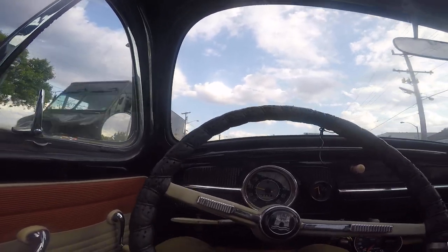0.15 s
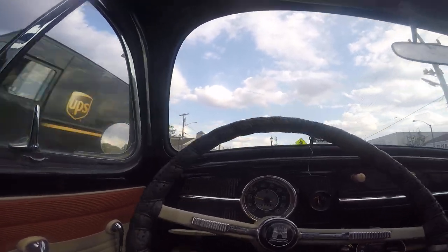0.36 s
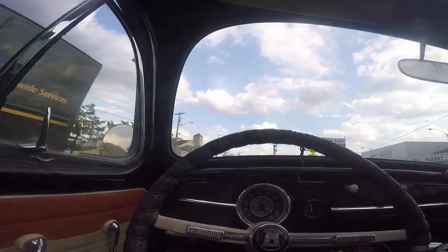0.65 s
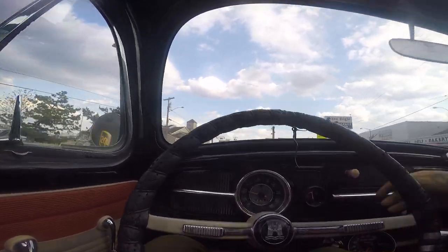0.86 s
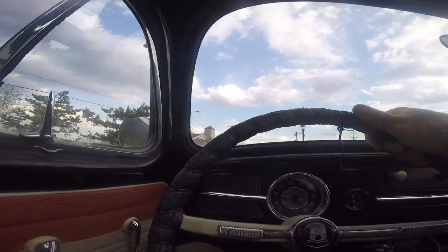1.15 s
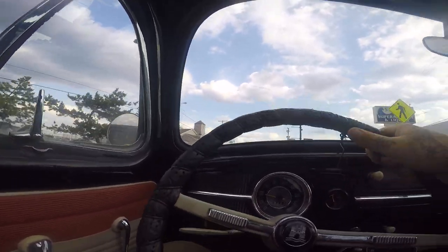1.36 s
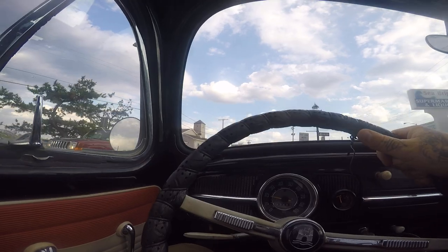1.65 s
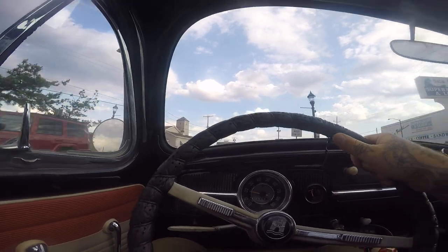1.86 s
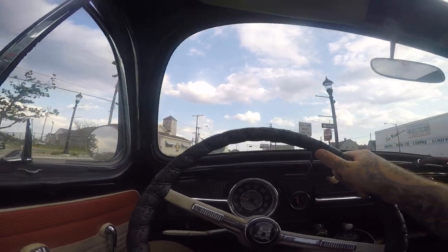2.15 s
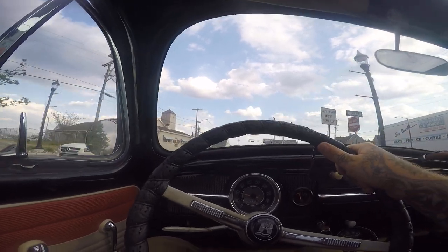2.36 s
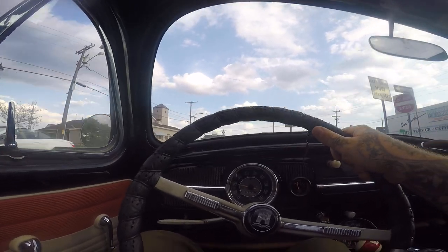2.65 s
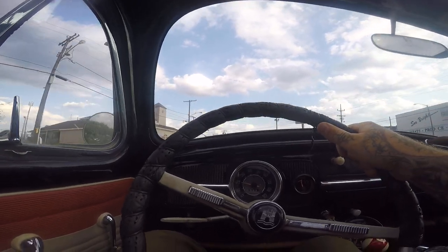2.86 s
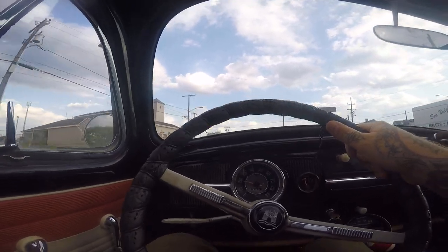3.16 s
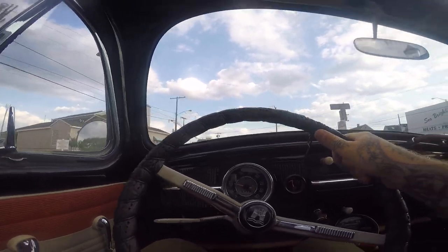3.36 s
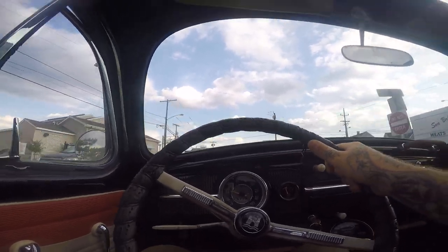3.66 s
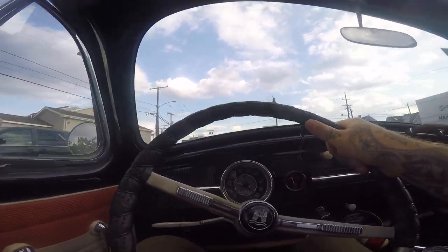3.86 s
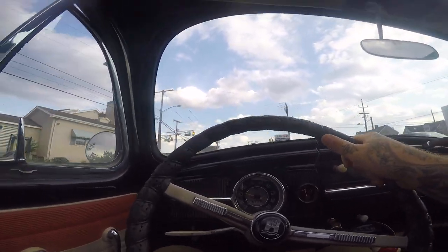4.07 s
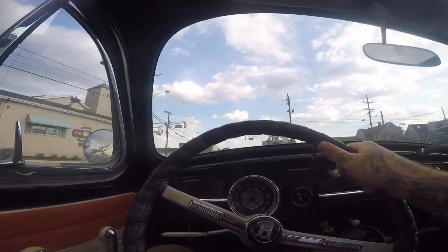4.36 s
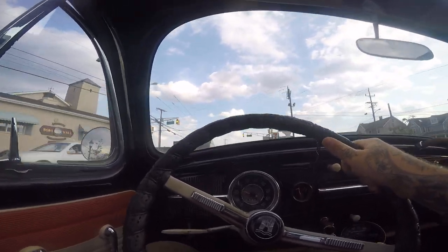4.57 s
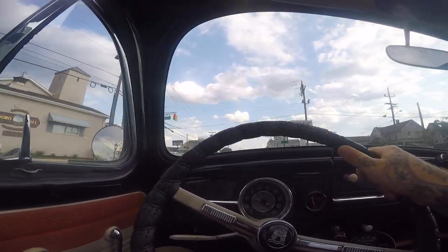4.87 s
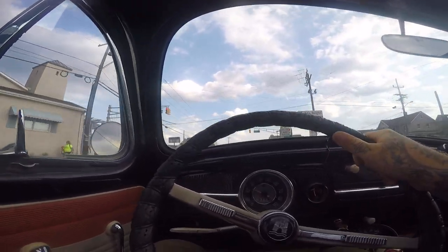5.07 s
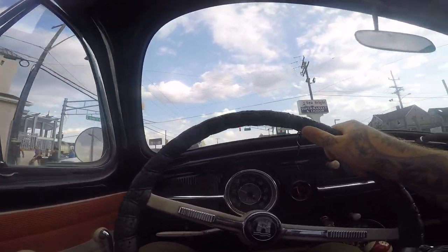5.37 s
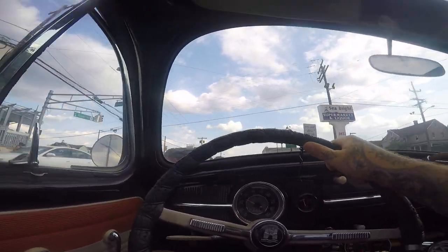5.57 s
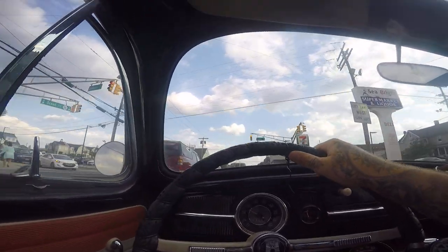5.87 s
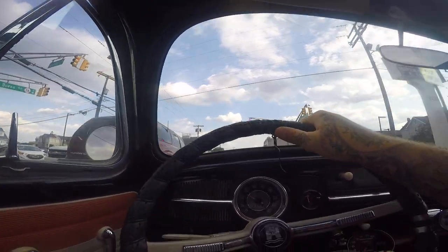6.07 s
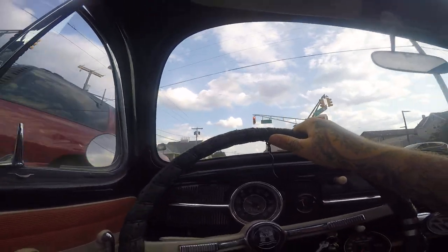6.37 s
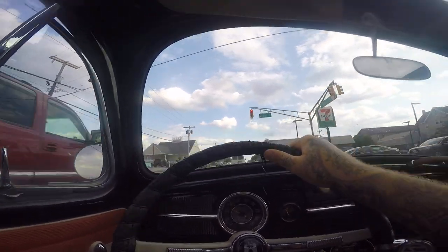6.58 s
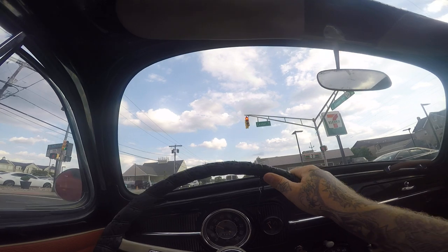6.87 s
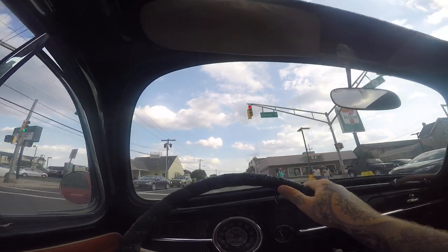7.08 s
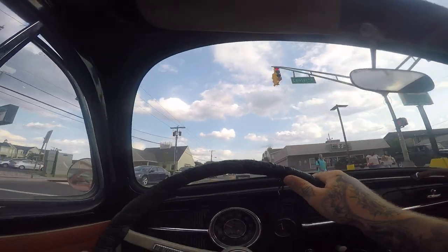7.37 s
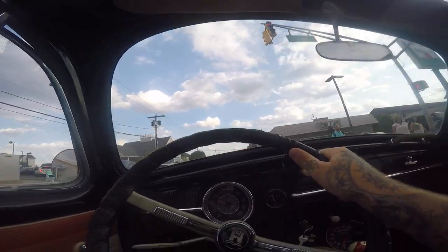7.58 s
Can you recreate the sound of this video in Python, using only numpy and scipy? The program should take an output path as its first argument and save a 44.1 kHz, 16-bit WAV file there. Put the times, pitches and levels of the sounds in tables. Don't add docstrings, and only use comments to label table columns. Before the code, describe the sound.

A boxed-in microphone in a vintage car cabin catches low engine booms, hollow road noise and faint gear whine. The engine sags early amid chattering trim, then steadily gains pitch, with scattered knocks and ticks. Near six seconds it eases off and coasts; around seven, rough tarmac brings a surge of roar, heavy thuds, glassy rattles and a short bright jingle before steady driving resumes.

```python
import sys
import numpy as np
from scipy import signal
from scipy.fft import rfft, irfft
from scipy.io import wavfile
from scipy.ndimage import uniform_filter1d

SR = 44100
rng = np.random.default_rng(int(sys.argv[2]) if len(sys.argv) > 2 else 0)


def ratio_of_db(decibels):
    return 10 ** (np.asarray(decibels, float) / 20)


def wrap_up_sound(samples):
    columns = np.atleast_2d(samples).T
    tamed = np.clip(columns, -1, 1)
    steps = np.round(tamed * 32767).astype(np.int16)
    wavfile.write(sys.argv[1], SR, steps)


N = 340893


def level(x, db):
    return x * ratio_of_db(db) / np.sqrt(np.mean(x ** 2))


def curves(table):
    s, *columns = np.transpose(table)
    return [np.interp(np.arange(N) / SR, s, c) for c in columns]


def bumps_db(hz, peaks):
    return sum(db / (1 + (2 * (hz - f) / w) ** 2) for f, w, db in peaks)


def colour(x, gain_db):
    cep = irfft(gain_db * np.log(10) / 20)
    half = len(cep) // 2
    cep[1:half] *= 2
    cep[half + 1:] = 0
    impulse = irfft(np.exp(rfft(cep)))[:half]
    return signal.fftconvolve(x, impulse)[:N]


def band(x, lo_hz, hi_hz, order=2):
    sos = signal.butter(order, [lo_hz, min(hi_hz, SR / 2.2)], "band", fs=SR, output="sos")
    return signal.sosfilt(sos, x)


def walk(rate):
    k = int(SR / rate)
    held = np.repeat(rng.standard_normal(N // k + 1), k)
    return 1.25 * uniform_filter1d(uniform_filter1d(held, k), k)[:N]


def add(out, s, db, hz, t60, rise_s):
    i = int(s * SR)
    t = np.arange(min(int(t60 * SR), N - i)) / SR
    envelope = ratio_of_db(db - 60 * t / t60) * (1 - np.exp(-t / rise_s))
    out[i:i + len(t)] += envelope * np.sin(2 * np.pi * hz * t)


def brake_squeal():
    # t/s, peak level/dB, fade/(dB/s)
    applications = [
        (0, -64, 87),
        (.19, -76, 70),
        (.32, -74, 80),
        (.46, -78, 40),
        (.54, -73, 140),
        (1.045, -65, 38),
    ]
    rest_start_s, rest_end_s = .72, 0.95
    attack_s = .03
    t = np.arange(N) / SR
    hz = 12420 - 620 * np.minimum(t, rest_end_s)
    size = 0
    for s, db, fade_db in applications:
        attack = np.clip((t - s) / attack_s + 1, 0, 1)
        size = size + ratio_of_db(db - fade_db * np.maximum(t - s, 0)) * attack
    size = size * ((t < rest_start_s) | (t > rest_end_s))
    tone = 0
    for gap_hz in (-90, 110):
        phase = 2 * np.pi * np.cumsum(hz + gap_hz + 55 * walk(150)) / SR
        tone = tone + ratio_of_db(5.5 * walk(60)) * np.sin(phase)
    return tone * size


def metal_ticks():
    # t/s, peak level/dB, f/Hz
    ticks = [(.5152, -55, 12100), (.832, -53, 9620), (4.064, -51, 10100), (5.6214, -54, 9710),
             (5.9808, -52, 14200), (6.3719, -46, 14200), (6.4188, -51, 12300), (6.5994, -60, 11200),
             (6.6544, -50.5, 10200), (6.9052, -38, 9460), (7.2325, -52, 9740), (7.3806, -52, 12200),
             (7.3844, -50, 9890), (7.5941, -50, 14190), (7.6595, -55, 9900), (7.66, -50, 13600)]
    # f/Hz, level/dB, t60/s
    key_modes = [
        (10070, -6, .14),
        (10400, 0, .13),
        (11140, -4, .1),
        (11700, -2, .06),
        (12440, -10, .09),
        (13030, -12, .09),
        (5700, -10, .1),
    ]
    out = np.zeros(N)
    for s, db, hz in ticks:
        for spread in (.93, 1, 1.05):
            add(out, s, db - 4, hz * spread, t60=0.022, rise_s=.0003)
    jingle_s, jingle_db = 7.068, -34
    for hz, db, t60 in key_modes:
        for late, detune in rng.random((4, 2)):
            touch_s, touch_db = jingle_s + .022 * late, jingle_db + db - 9 * late
            add(out, touch_s, touch_db, hz * (.985 + .03 * detune), t60 / 2, .003)
    return out


def rattles():
    # t/s, level/dB, panel level/dB, glass level/dB
    jolts = [(.24, -29, 1, -13), (0.292, -26.5, -5, -10), (.36, -31, -9, -8.5), (0.445, -31.5, 1.5, -14),
             (.546, -35.5, 5.5, -15), (0.571, -36.5, 2, -10), (.619, -31, -7, -6), (.74, -30, -1, -15),
             (1.9692, -43.5, -12, -2.5), (2.1886, -30, -6, -29), (2.4357, -27.5, -3.5, -18),
             (2.803, -35, 1, -18), (3.0373, -38, -11, -1.5), (3.3858, -29, -3, -8), (3.711, -31, -8, -29),
             (3.785, -31.5, -3, -16), (4.5465, -46, -3, -8), (4.943, -21, -2, -19), (6.416, -29, -4.5, -13),
             (6.7305, -28.5, .6, -8), (6.842, -32, -4, 0.5), (6.8927, -26.5, -4, -1), (6.945, -26, 1, 3),
             (7.0379, -24, -1.2, -9), (7.073, -29, -8, -0.3), (7.101, -23, -20, -5), (7.13, -24.5, 6, -10),
             (7.158, -34.5, -11, 8), (7.209, -19, -1.5, -35), (7.547, -35, -7, -3.5)]
    # f/Hz, width/Hz, level/dB
    panel_modes = [(746, 105, 1), (830, 56, -3.5), (985, 115, 1.5), (1063, 53, -7)]
    # f/Hz, width/Hz, level/dB
    trim_modes = [(1832, 165, 0), (2260, 430, -2), (2636, 410, -2.5)]
    shakes = np.zeros((3, N))
    t = np.arange(SR // 4) / SR
    shape = np.minimum(t / 0.002, 1) * np.exp(-(t / 0.037) ** 2.6)
    for s, db, panel_db, glass_db in jolts:
        i = int(s * SR)
        part_db = db + np.array([[panel_db], [0], [glass_db]])
        shakes[:, i:i + len(t)] += (ratio_of_db(part_db) * shape)[:, :N - i]
    chatter = rng.standard_normal(N) * ratio_of_db(3.44 * walk(400))
    rings = 0
    for shake, modes in zip(shakes, (panel_modes, trim_modes)):
        for f, w, db in modes:
            ring = band(chatter * shake, f - w / 2, f + w / 2)
            rings = rings + ratio_of_db(db) * ring * np.sqrt(SR / w)
    glass = rng.standard_normal(N) * ratio_of_db(1.4 * walk(300)) * shakes[2]
    return rings * ratio_of_db(-18.5), band(glass, 3300, 16000) * ratio_of_db(20)


def floor_knocks():
    # t/s, peak level/dB, f/Hz, t60/s
    thumps = [(.295, -21.5, 475, 0.097), (.296, -27, 560, 0.11), (.76, -26, 111, .3),
              (1.1, -43.5, 331, 0.88), (2.799, -20, 75.7, 0.43), (3.391, -22.5, 177, 0.29),
              (4.2, -23, 180.4, 0.52), (4.857, -9.5, 37.3, 0.57), (5.07, -21, 150, 0.26),
              (6.871, -15, 53.5, 0.41), (6.894, -12, 168.4, 0.2), (6.899, -14, 135, 0.18),
              (6.925, -16, 372, 0.1), (7.101, -18, 59.5, 0.81), (7.08, -26, 150, 0.38)]
    # t/s, peak level/dB, f/Hz, t60/s
    clip_rings = [(.244, -31, 830, 0.073), (.294, -30, 2340, 0.086), (.744, -36, 1850, .1),
                  (.744, -32, 800, 0.084), (2.19, -29.5, 1830, 0.061), (2.203, -35, 985, 0.072),
                  (2.439, -35, 1830, 0.063), (2.451, -34, 985, 0.086), (2.804, -35, 1850, 0.18),
                  (3.4, -32, 830, 0.16), (3.404, -32, 985, 0.11), (4.943, -25.5, 1860, 0.075),
                  (4.955, -34, 1008, 0.11), (4.96, -33.5, 2740, 0.13), (6.73, -23.5, 912, 0.066),
                  (6.73, -30, 1840, .08), (7.036, -25, 1825, .15), (7.215, -23.5, 1080, 0.11),
                  (7.215, -34, 1854, 0.12)]
    out = np.zeros(N)
    for s, db, hz, t60 in thumps + clip_rings:
        add(out, s, db, hz, t60, min(.004, 2 / hz))
    return out


def suspension():
    # t/s, rumble level/dB, half length/s, harshness (roar lift)/dB
    uneven = [(.27, -35, 0.28, 1.2), (0.62, -23, 0.037, 1.2), (.92, -29.5, 0.19, -0.3),
              (1.302, -39, 0.092, 1.2), (1.804, -34.5, 0.17, .1), (2.06, -32.5, .08, 1.1),
              (2.217, -35, 0.04, 1.3), (2.603, -29.5, 0.18, 0.7), (3.064, -36, 0.051, .1),
              (3.296, -34, 0.18, -1.6), (3.597, -27.5, 0.11, -1.7), (3.861, -25, 0.062, -0.9),
              (4.069, -27, 0.051, -0.5), (4.3, -36, 0.37, 0.45), (4.875, -32, 0.083, .3),
              (5.06, -38, .05, 1.5), (5.24, -21.5, 0.056, 1.5), (5.433, -40, .04, -0.5),
              (5.653, -37, 0.067, -0.1), (5.842, -34, 0.093, 0.4), (6.25, -30, 0.33, 0.7),
              (6.556, -30.5, 0.092, 1.2), (6.788, -23.5, 0.085, 4), (6.927, -16, 0.067, 11),
              (7.032, -28, 0.039, 4.5), (7.138, -16.5, 0.076, 7), (7.238, -27, 0.022, 4),
              (7.494, -29.5, 0.17, -0.5), (7.73, -28, 0.052, 0.5)]
    s, db, half_s, lift_db = np.transpose(uneven)[:, :, None]
    coarse = np.arange(0, N + 64, 64)
    bells = np.exp(-((coarse / SR - s) / half_s) ** 2)
    rumble = np.interp(np.arange(N), coarse, (ratio_of_db(db) * bells).sum(axis=0))
    harsh_db = np.interp(np.arange(N), coarse, (lift_db * bells).sum(axis=0))
    smooth_tarmac_db = -50.5
    return 20 * np.log10(ratio_of_db(smooth_tarmac_db) + rumble), harsh_db


def road(turn, throttle_db, rumble_db, harsh_db):
    # t/s, level/dB
    tyres = [(0, -36), (.2, -38), (.62, -38), (.85, -41), (1.3, -42.5), (2.1, -41), (3, -38.5), (3.5, -36),
             (4, -39), (4.5, -37), (5.2, -36.5), (5.66, -35.5), (6.03, -38.5), (6.4, -37.5), (6.7, -36),
             (7.3, -36), (7.73, -37)]
    roar_db, = curves(tyres)
    treble_db = 0.06 + 0.17 * np.arange(N) / SR + 0.27 * harsh_db
    drone_db = -41.5 - 0.37 * throttle_db + 0.48 * harsh_db
    drone_db = drone_db + 0.7 * (roar_db - roar_db.mean())
    shared, roar = walk(9), 0
    for k, hz in enumerate(180 * 2. ** np.arange(7)):
        flutter_db = 0.54 * shared + 0.67 * walk(20)
        tilt_db = k / 6 * (treble_db + 0.88 * np.cos(turn))
        roar = roar + ratio_of_db(flutter_db + tilt_db) * band(rng.standard_normal(N), hz, 2 * hz)
    rumble = level(band(rng.standard_normal(N), 7.6, 61.0), 0) * ratio_of_db(rumble_db)
    drone = level(band(rng.standard_normal(N), 130, 214.0), 0) * ratio_of_db(drone_db)
    return roar * ratio_of_db(roar_db + harsh_db), rumble + drone


def housing(x):
    # f/Hz, density/dB per Hz
    slope = [(150, -10), (260, -7.5), (371, -5), (433, -3.5), (1060, -10.5), (1280, -15.5), (1770, -10),
             (2100, -13), (2280, -10.5), (3610, -15.5), (4500, -20), (4980, -29), (15000, -45)]
    # f/Hz, width/Hz, gain/dB
    cavities = [(429, 25, 4.5), (693.5, 18, 7), (820, 84, 2), (1051, 54, 4.5), (1300, 90, -3.5),
                (1387, 66, 6.5), (1807, 182, 5.5), (2116, 72, -3.5), (2244, 74, 3), (2846, 140, 4),
                (2920, 61, -13.5), (3195, 120, -6.5), (3740, 490, 3), (4470, 320, 3.5), (5534, 460, 8),
                (6665, 550, 8.5), (7960, 260, 5.5), (10100, 200, 4)]
    hz = np.linspace(1, SR / 2, 4097)
    f, db = np.transpose(slope)
    return colour(x, np.interp(np.log(hz), np.log(f), db) + bumps_db(hz, cavities))


def gearbox_whine():
    # t/s, f/Hz, level/dB
    mesh = [
        (0, 768, -52),
        (.7, 767, -68),
        (.95, 765, -50),
        (1.25, 766, -60),
        (2.5, 813, -57),
        (2.9, 813, -51.5),
        (3.4, 830, -50.5),
        (4, 837, -51.5),
        (4.4, 827, -57),
        (7.73, 851, -83),
    ]
    hz, db = curves(mesh)
    phase = 2 * np.pi * np.cumsum(hz + 22 * walk(70)) / SR
    return np.sqrt(2) * ratio_of_db(db + 3.15 * walk(24.91)) * np.sin(phase)


def engine(rumble_db):
    # t/s, four-stroke cycle rate f/Hz, throttle level/dB, firing tone level/dB
    driving = [(0, 21.9, -3, -31), (.19, 21.4, -4, -30), (.32, 20.2, -12, -29), (.6, 17.4, -12, -31),
               (.9, 15.35, -12, -29.5), (1.07, 15.6, -12, -30), (1.18, 16, -6, -36),
               (2.04, 16.05, -3.5, -34.5), (2.4, 16.27, -3.5, -34), (2.6, 16.4, 0, -32.5),
               (3.55, 17.35, 0, -32), (5.3, 19.45, -1, -32.5), (5.7, 19.7, -2, -33),
               (5.95, 19.75, -16, -33), (6.35, 19.75, -14, -33), (6.6, 19.55, -5, -37),
               (6.9, 19.15, -3, -35), (7.73, 19.4, -5, -34.5)]
    combustion_db = [-50, -43.5, -32.5, -49, -38, -44.5, -40.5, -47.5, -43.5, -46, -47, -53.5, -43, -52.5,
                     -51.5, -55, -55.5, -62, -61, -61.5]
    # multiple, rms level/dB
    crank_shake = [(2, -37), (6, -50), (8, -49), (16, -58)]
    # f/Hz, width/Hz, gain/dB
    shell_modes = [(39.5, 7, 9), (147, 14, -5), (170, 26, 7.5), (190, 22, 5)]
    hz, throttle_db, firing_db = curves(driving)
    pipe_db = -46.5 + 0.48 * throttle_db + bumps_db(12 * hz, [(189.6, 34.3, 14.3)])
    shake_db = -1.5 + 0.18 * (rumble_db - rumble_db.mean()) + 0.87 * walk(4)
    turn = 2 * np.pi * np.cumsum(uniform_filter1d(hz, size=3000)) / SR
    rows = []
    for k, db in enumerate(combustion_db, start=1):
        load = .6 if k < 8 else 1.3
        rows.append((k, db + throttle_db * load))
    rows += [(round(k), db + shake_db) for k, db in crank_shake]
    rows = [(k, db + bumps_db(k * hz, shell_modes)) for k, db in rows]
    rows += [(4, firing_db), (12, pipe_db)]
    start = 2 * np.pi * rng.random(len(combustion_db) + 1)
    out = 0
    for k, db in rows:
        phase = k * turn + start[k] + .38 * walk(10)
        out = out + ratio_of_db(db + 2.2 * walk(9)) * np.sin(phase)
    return np.sqrt(2) * out, turn, throttle_db


def scene():
    rumble_db, harsh_db = suspension()
    boom, turn, throttle_db = engine(rumble_db)
    roar, rumble = road(turn, throttle_db, rumble_db, harsh_db)
    rings, glass = rattles()
    airborne = housing(roar * ratio_of_db(14) + glass)
    body = boom + gearbox_whine() + rumble + rings + floor_knocks()
    return (body + airborne + metal_ticks() + brake_squeal())[None]


def roll_off(x):
    return signal.sosfilt(signal.butter(12, 15190, fs=SR, output="sos"), x)


def record(dry):
    hiss = ratio_of_db(-70.5) * rng.standard_normal(N)
    whistle = ratio_of_db(-80) * np.sin(2 * np.pi * 15081 * np.arange(N) / SR)
    ceiling = .75
    rounded = np.tanh((dry + hiss + whistle) / ceiling) * ceiling
    low_pass = signal.ellip(8, .2, 70, 15200, fs=SR, output="sos")
    return roll_off(signal.sosfilt(low_pass, rounded))


dry = scene()
out = record(dry)
wrap_up_sound(out)
```